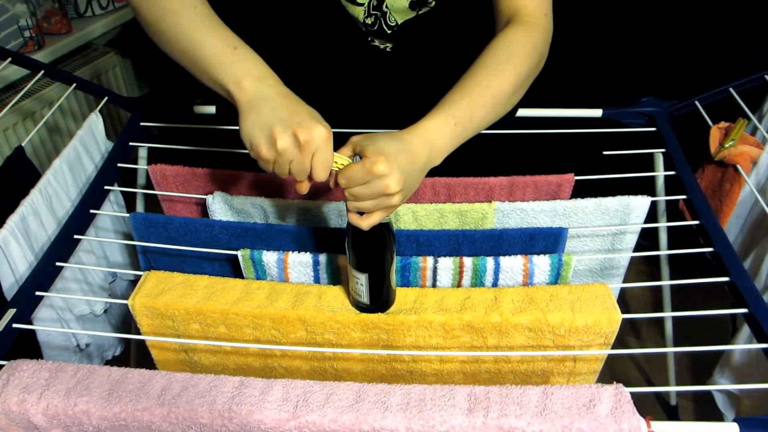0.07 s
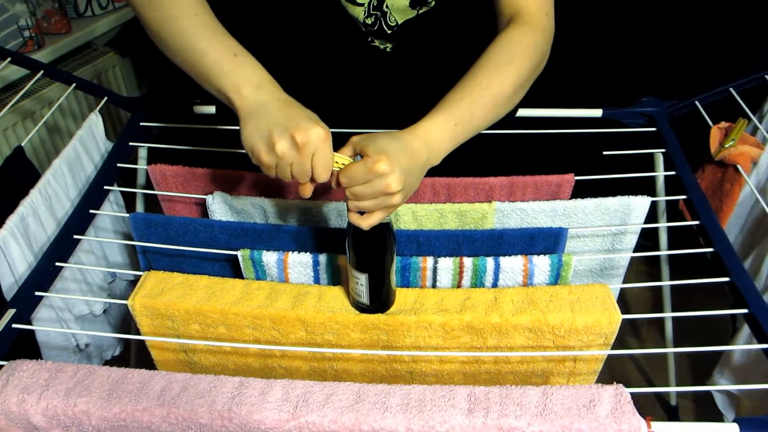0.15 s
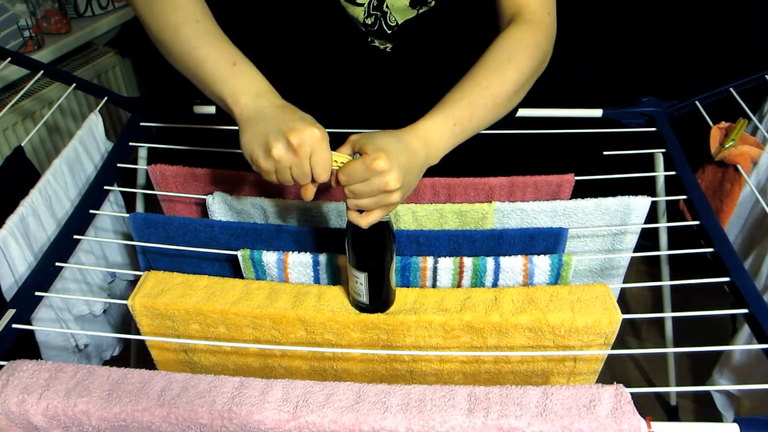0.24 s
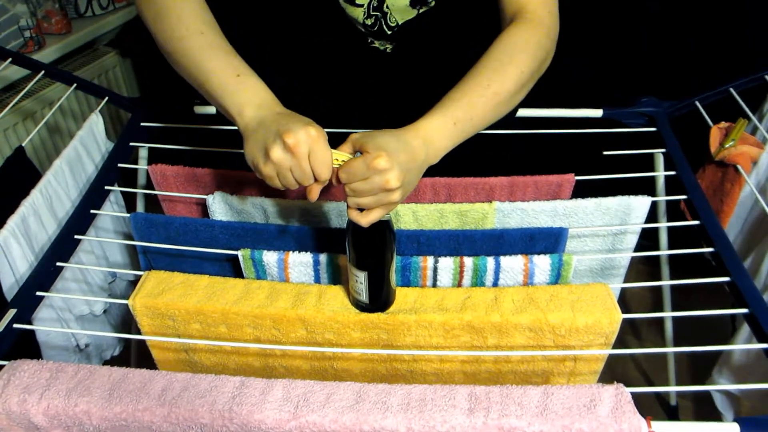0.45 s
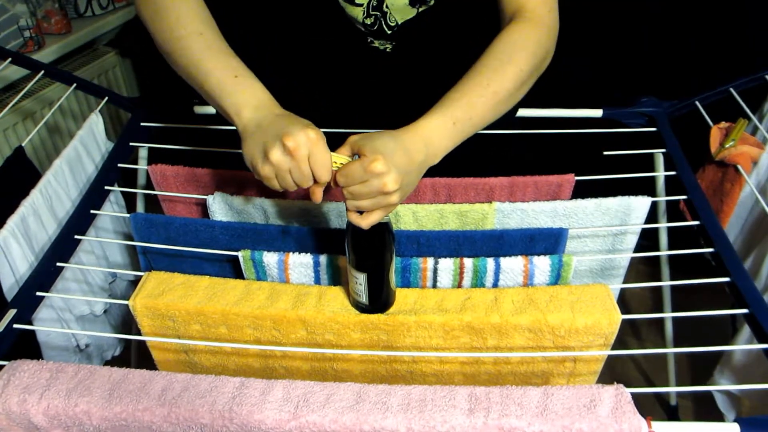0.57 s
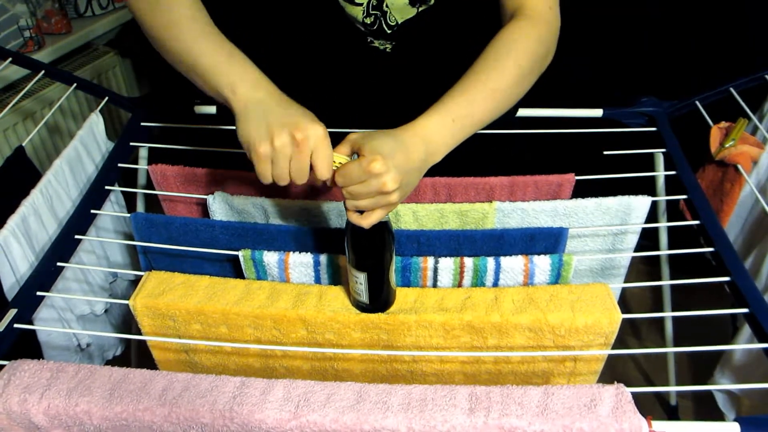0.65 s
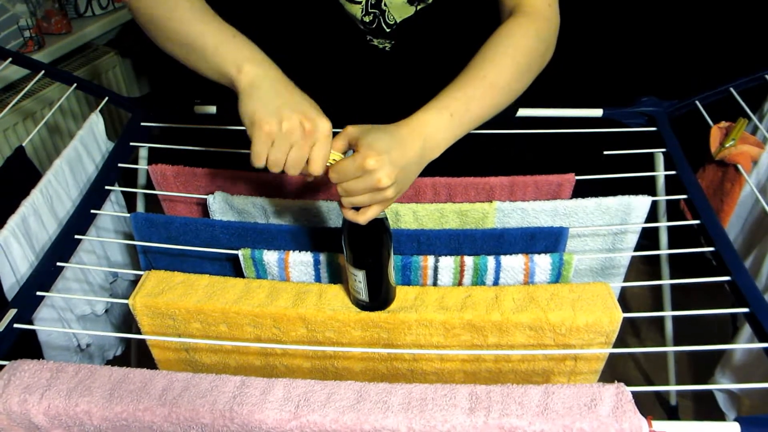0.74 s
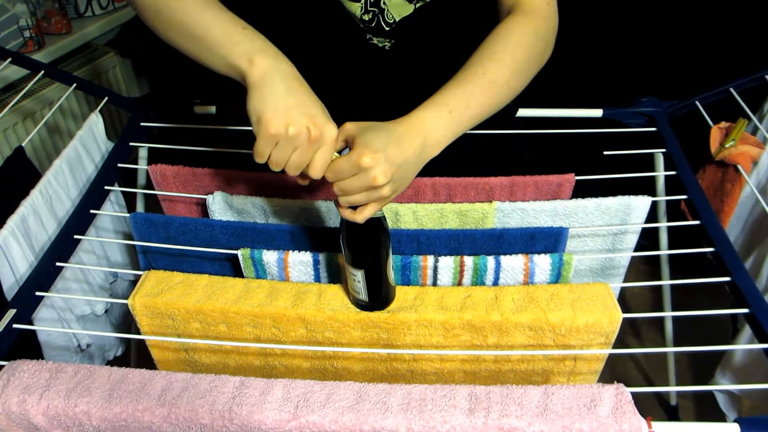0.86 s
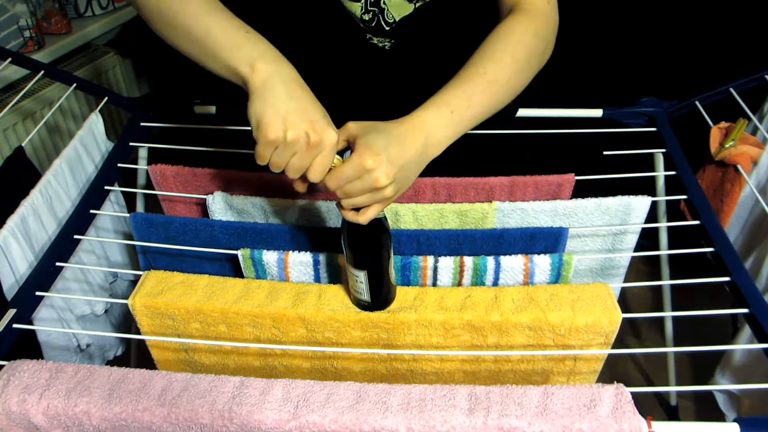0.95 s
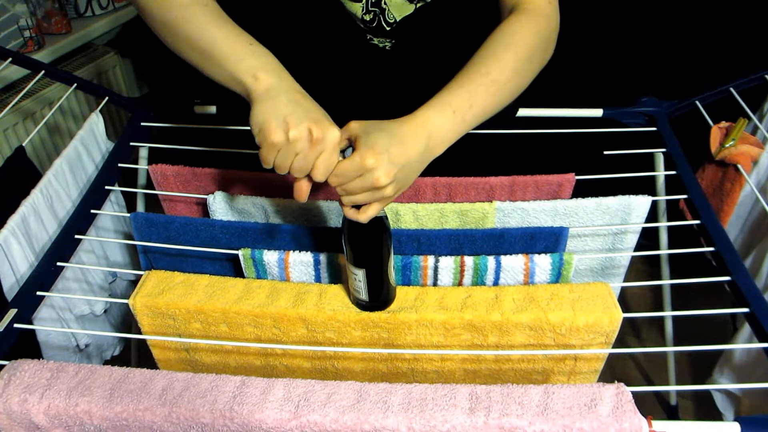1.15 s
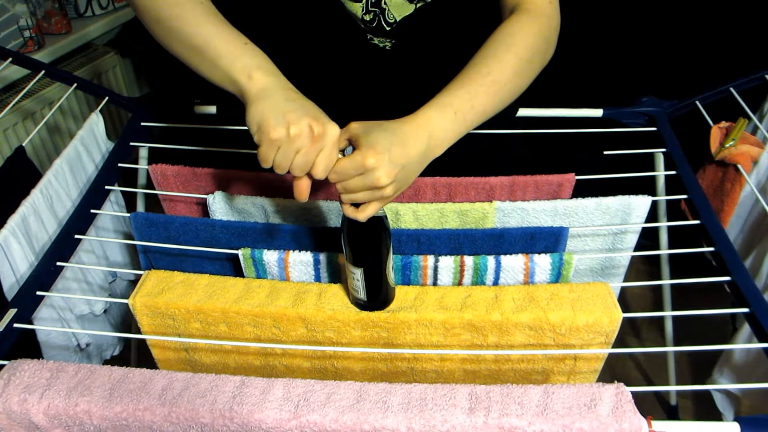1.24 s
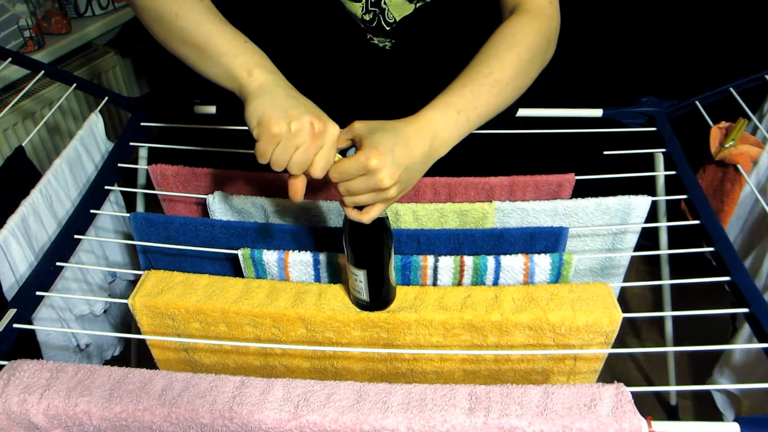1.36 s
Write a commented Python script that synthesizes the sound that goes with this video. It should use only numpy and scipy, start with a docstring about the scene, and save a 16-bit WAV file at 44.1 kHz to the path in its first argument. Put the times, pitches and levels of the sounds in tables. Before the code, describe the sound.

Faint camera motor ticks and dull handling knocks, one harder with a clack, then a bottle cap snaps free very loudly and briefly; soft bumps and light metal taps end it, in a small quiet room, mono.

```python
"""Crown cap levered off a bottle

In a small, soft room a cap snaps free at 0.4 s: ringing modes and noise, near echoes, a fast noise tail.
Dull knocks ring the camera housing as damped modes, the hard one at 0.198 s with a bright clack.
Its focus motor ticks evenly at first (noise bursts); opener clicks, finger rubs, late bright ticks and
cap taps are bursts and modes. Filtered noise makes room rumble, housing drone and hiss."""
import sys
import numpy as np
from scipy import signal
from scipy.fft import rfft, irfft
from scipy.io import wavfile
from scipy.ndimage import uniform_filter1d

SR = 44100
rng = np.random.default_rng(int(sys.argv[2]) if len(sys.argv) > 2 else 0)


def to_wav(s):
    """Save 16-bit WAV."""
    ch = np.atleast_2d(s).T  # columns
    pcm = np.round(np.clip(ch, -1, 1) * 32767)  # PCM
    wavfile.write(sys.argv[1], SR, pcm.astype(np.int16))


N = 61739
T = np.arange(N) / SR

# small metal contact, click and scrape spectrum: f/Hz, density/dB
CLICK = [(1300, -10), (1600, -0.5), (2500, 4.5), (3300, -2.5), (4100, -8), (4800, -18.5)]
SCRAPE_T60_S = 0.14


def undb(db):
    """dB to gain."""
    return 10 ** (np.asarray(db) / 20)


def curve(rows):
    """Gain over time, interpolated in dB from (t/s, level/dB) rows."""
    return undb(np.interp(T, *np.array(rows).T))


def coloured(points, size=N):
    """Noise of rms 1 with an (f/Hz, density/dB) spectrum, silent outside it."""
    f_hz, db = np.array(points).T
    bins_hz = np.fft.rfftfreq(size, 1 / SR) + 1
    gain = undb(np.interp(np.log(bins_hz), np.log(f_hz), db, -200, -200))
    x = irfft(rfft(rng.standard_normal(size)) * gain, size)
    return x / x.std()


def walk(rate_hz):
    """Random wander of spread 1: white noise averaged twice over 1/rate_hz."""
    k = int(SR / rate_hz)
    w = uniform_filter1d(uniform_filter1d(rng.standard_normal(N), k), k)
    return w / w.std()


def envelope(t, rise_s, t60_s):
    """Exponential rise times a 60 dB decay in t60_s."""
    return (1 - np.exp(-t / rise_s)) * 1000. ** (-t / t60_s)


def ring(modes, rise_s, lag_at_1k_s=0.):
    """Sum of decaying sine modes (f/Hz, level/dB, T60/s); each starts late in proportion to its period."""
    out = 0
    for hz, db, t60_s in modes:
        t = np.maximum(T[:8192] - lag_at_1k_s * 1000 / hz, 0)
        out = out + undb(db) * envelope(t, rise_s, max(t60_s, 1e-3)) * np.sin(2 * np.pi * hz * t)
    return out


def burst(points, t60_s, rise_s):
    """Short puff of coloured noise."""
    t = T[:8192]
    return coloured(points, size=len(t)) * envelope(t, rise_s, t60_s)


def add(out, at_s, x):
    """Mix x in at a time."""
    i = int(at_s * SR)
    out[i:i + len(x)] += x[:N - i]


def room_rumble():
    """Low-weighted room noise, its level wandering."""
    # rumble spectrum: f/Hz, density/dB
    spectrum = [(15, -5.5), (25, 0), (108, -4), (264, -10), (500, -13), (900, -10), (1250, -18.5),
                (1450, -28), (2000, -34.5)]
    # rumble level: t/s, level/dB
    level = [(0.0, -59.5), (0.338, -58.5), (0.51, -64), (0.7, -63.5), (1.054, -61), (1.4, -63.5)]
    return curve(level) * undb(1.1 * walk(15)) * coloured(spectrum)


def housing_drone():
    """The housing rings with handling rumble: a narrow noise band, its level wandering."""
    # drone level: t/s, level/dB
    level = [(0.0, -63), (0.15, -64), (0.272, -58.5), (0.358, -62), (0.54, -67.5), (0.75, -66.5),
             (1.016, -62), (1.4, -65.5)]
    centre_hz, width_hz = 1160.6, 170
    edge_hz = width_hz / 2
    spectrum = [(centre_hz - 3 * edge_hz, -22), (centre_hz - edge_hz, -3), (centre_hz, 0),
                (centre_hz + edge_hz, -3), (centre_hz + 3.04 * edge_hz, -24)]
    return curve(level) * undb(1.7 * walk(23.6)) * coloured(spectrum)


def room_hiss():
    """Soft mid-band room noise, its level wandering."""
    # room hiss spectrum: f/Hz, density/dB
    spectrum = [(1300, -5.5), (1500, 1), (2000, -3), (3000, -4.5), (3800, -15.5), (4500, -26)]
    # room hiss level: t/s, level/dB
    level = [(0.0, -74), (0.388, -79.5), (0.7, -80), (1.144, -78.5), (1.4, -81.5)]
    return curve(level) * undb(1.2 * walk(35)) * coloured(spectrum)


def preamp_hiss():
    """High-band preamp noise on a slow level curve."""
    # preamp hiss spectrum: f/Hz, density/dB
    spectrum = [(4200, -12.5), (5000, -24.5), (5900, -11.5), (6900, -7), (9000, -11.5), (10200, -20.5),
                (11300, -13.5), (12500, -6.5), (15400, -5), (16000, -11.5)]
    # preamp hiss level: t/s, level/dB
    level = [(0.0, -86.5), (0.396, -83.5), (0.584, -88.5), (0.758, -89.5), (0.992, -86), (1.4, -89.5)]
    return curve(level) * coloured(spectrum)


def motor_ticks():
    """Focus motor steps: evenly spaced noise bursts of uneven level."""
    # level of each motor step: level/dB
    levels = [-61.5, -66, -56.5, -54, -64, -64.5, -70, -66.5, -63, -67.5, -64.5]
    # tick spectrum: f/Hz, density/dB
    spectrum = [(2500, -4), (3300, -2.5), (4300, -17.5), (5300, -3.5), (6500, -18), (9500, -19),
                (12500, -4), (15800, -16)]
    start_s, period_s, t60_s = .0112, .06248, 0.0065
    out = np.zeros(N)
    for k, db in enumerate(levels):
        add(out, start_s + k * period_s, undb(db) * burst(spectrum, t60_s, 0.00012))
    return out


def housing_knocks():
    """Knocks carried into the housing excite its ring and a lower thud."""
    # knocks: t/s, level/dB, thud re ring/dB, rise/s
    knocks = [(0.049, -48, -8, 0.00084), (0.136, -48, -4, 0.0022), (0.1987, -28, -12, 0.00058),
              (0.2203, -42.5, -1, 0.001), (0.3227, -50.5, -12, 0.00091), (.347, -33, -11, 0.0028),
              (0.359, -74, -15, 0.0035), (.368, -40, -14, 0.0035), (0.424, -54.5, -9, 0.0037),
              (0.629, -48.5, -9, 0.0052), (.792, -49, -9.5, 0.0032), (0.896, -43, -9.5, 0.0031),
              (1.003, -44.5, -12, 0.0012), (1.039, -44, -18, 0.0017), (1.05, -44.5, -27, 0.003),
              (1.126, -60, -14.5, 0.003), (1.156, -51.5, -5.5, 0.0011)]
    # housing modes: f/Hz, level/dB, T60/s
    housing = [(1124, 2.5, 0.036), (1206, -10.5, 0.049)]
    # thud modes: f/Hz, level/dB, T60/s
    thud = [(62, -14, 0.05), (163, -6, 0.026), (368, -7.5, 0.036), (506, 0.5, 0.034), (862, -3, 0.04)]
    out = np.zeros(N)
    for s, db, thud_db, rise_s in knocks:
        add(out, s, undb(db) * (ring(housing, rise_s) + undb(thud_db) * ring(thud, rise_s)))
    return out


def opener_clicks():
    """Opener on the cap: a noise click, a brighter shorter one and a slower scrape."""
    # clicks: t/s, level/dB, bright part/dB, scrape/dB (parts relative to level)
    clicks = [(0.1981, -50, 0.5, -18), (.346, -65.5, -9, -4), (.697, -71, -18, -4.5)]
    # bright part spectrum: f/Hz, density/dB
    bright_spectrum = [(4500, -17), (5300, 5.5), (7500, -6.5), (9300, 10), (11000, -7), (12300, 1),
                       (15800, -21)]
    click_t60_s, bright_t60_s = 0.029, 0.011
    out = np.zeros(N)
    for s, db, bright_db, scrape_db in clicks:
        click = burst(CLICK, click_t60_s, 0.0003)
        bright = undb(bright_db) * burst(bright_spectrum, bright_t60_s, 0.00025)
        scrape = undb(scrape_db) * burst(CLICK, SCRAPE_T60_S, 0.0043)
        add(out, s, undb(db) * (click + bright + scrape))
    return out


def housing_clack():
    """Upper modes of the hard knock at 0.198 s: a bright, short clack on the housing."""
    # clack modes: f/Hz, level/dB, T60/s
    modes = [(1587, 1.5, 0.032), (2260, 0.5, 0.022), (2770, 1, .017), (3200, -5.5, 0.016),
             (5030, -9.5, 0.013)]
    at_s, level_db = .1982, -44
    out = np.zeros(N)
    add(out, at_s, undb(level_db) * ring(modes, 0.00068))
    return out


def finger_rubs():
    """Fingers slide on the glass: decaying low-mid noise."""
    # rubs: t/s, level/dB, T60/s
    rubs = [(.344, -49, .09), (.405, -50, .2)]
    # rub spectrum: f/Hz, density/dB
    spectrum = [(150, -8), (360, 0.5), (520, -8), (800, 0.5), (950, -2), (1250, -6.5), (1700, -14.5)]
    out = np.zeros(N)
    for s, db, t60_s in rubs:
        add(out, s, undb(db) * burst(spectrum, t60_s, 0.0023))
    return out


def room_tail():
    """The room's answer to the pop: noise bands with their own decays and grainy levels."""
    # tail spectrum: f/Hz, density/dB
    spectrum = [(150, -16), (400, -13.5), (900, -10.5), (1450, -18.5), (1800, -13.5), (2200, -6.5),
                (2550, -0.5), (2800, -4.5), (3100, -10.5), (3800, -4), (5100, -11.5), (7000, -7),
                (12600, -3.5), (15600, -13), (16100, -42)]
    # tail decay: f/Hz, T60/s
    decay = [(200, 0.3462), (1000, 0.41), (2500, 0.2), (4000, 0.18), (7000, 0.14), (12000, 0.15),
             (16000, 0.15)]
    level_db, rise_s = -28, 0.004
    grain_db, grain_rate_hz = 2, 280
    t = T[:16384]
    out = np.zeros(len(t))
    f_hz, t60_s = np.array(decay).T
    noise = rfft(coloured(spectrum, size=len(t)))
    bins_hz = np.fft.rfftfreq(len(t), 1 / SR)
    for k in range(len(f_hz)):
        # triangular bands over log frequency, summing to one
        weight = np.interp(np.log(bins_hz + 1), np.log(f_hz), np.arange(len(f_hz)) == k)
        band = irfft(noise * weight)
        gain = undb(level_db + grain_db * walk(grain_rate_hz)[:len(t)])
        out += gain * band * envelope(t, rise_s, t60_s[k])
    return out


def pop():
    """The cap snaps free: cap modes, gas and rim noise, air in the neck, early echoes and room tail."""
    # cap modes: f/Hz, relative level/dB, T60/s
    cap_modes = [(2350, -3.5, 0.0051), (3922, -1.5, .004), (5190, -2.5, 0.004), (6320, -2, 0.0067)]
    # bright edge of the crack: f/Hz, relative level/dB, T60/s
    snap_modes = [(7700, 2, .0013), (10230, 4, 0.0016), (12500, 6, 0.0016), (15000, 5, .0013)]
    # air in the neck: f/Hz, relative level/dB, T60/s
    neck_modes = [(200, -5, .012), (350, -7, .02), (600, -9, .014), (760, 0, .018), (1250, -2, .04)]
    # early echoes: delay/s, crack level/dB, snap level/dB
    echoes = [(.0016, -12, -16), (.0031, -22, -12), (.0053, -10, -2), (.0068, -18, -10), (0.0113, -24, -20),
              (0.0198, -30, -20), (.0214, -26, -20)]
    at_s, level_db, neck_db = .3983, -5, -37
    lag_at_1k_s = .0012  # low modes speak later than high ones
    rattle_db, rattle_t60_s = -15, 0.016
    out = np.zeros(N)
    crack = ring(cap_modes, .0001, lag_at_1k_s) / 2
    snap = ring(snap_modes, .00003, lag_at_1k_s) / 2
    rattle_noise = coloured([(1700, -8), (2400, -2.0), (6000, 0.5), (16000, 1.0)], size=8192)
    rattle = undb(rattle_db) * rattle_noise * 1000. ** (-T[:8192] / rattle_t60_s)
    neck = undb(neck_db) * ring(neck_modes, 0.00036)
    add(out, at_s, undb(level_db) * (crack + snap + rattle) - neck)
    for delay_s, crack_db, snap_db in echoes:
        add(out, at_s + delay_s, undb(level_db) * (undb(crack_db) * crack + undb(snap_db) * snap))
    add(out, at_s, room_tail())
    return out


def bright_ticks():
    """Late bright ticks: very short high noise bursts, the last on a motor step."""
    # ticks: t/s, level/dB
    ticks = [(.484, -57), (.4995, -61), (.5097, -53)]
    # bright tick spectrum: f/Hz, density/dB
    spectrum = [(5000, -12), (6500, -14), (9000, -9), (12500, 9), (14000, -11)]
    out = np.zeros(N)
    for s, db in ticks:
        add(out, s, undb(db) * burst(spectrum, 0.0053, 0.00038))
    return out


def cap_taps():
    """The loose cap touches the glass: cap and glass modes, one echo and a scrape."""
    # taps: t/s, level/dB, bright part/dB, glass ring/dB (parts relative to level)
    taps = [(1.0051, -50, -8.5, -23), (1.1024, -57, -13, -31)]
    # tap modes: f/Hz, level/dB, T60/s
    tap_modes = [(2320, -4.5, 0.013), (2545, 2.5, 0.0096), (3110, -3.5, 0.011), (3830, -4, 0.0086)]
    # bright tap modes: f/Hz, level/dB, T60/s
    bright_modes = [(5600, -8.5, 0.007), (7500, -13, 0.0089), (9200, -11, .008), (10900, -4, 0.0063),
                    (12100, 0.5, 0.0073)]
    # glass modes: f/Hz, level/dB, T60/s
    glass_modes = [(4050, -1, 0.14), (4150, 0, .08)]
    echo_s, echo_db, scrape_db = 0.0049, -13, -18
    out = np.zeros(N)
    for s, db, bright_db, glass_db in taps:
        bright = undb(bright_db) * ring(bright_modes, .0002)
        glass = undb(glass_db) * ring(glass_modes, .002)
        tap = undb(db) * (ring(tap_modes, 0.00033) + bright + glass)
        scrape = undb(db + scrape_db) * burst(CLICK, SCRAPE_T60_S, .004)
        add(out, s, tap + scrape)
        add(out, s + echo_s, undb(echo_db) * tap)
    return out


def scene():
    """All sources, mono."""
    background = room_rumble() + housing_drone() + room_hiss() + preamp_hiss()
    handling = motor_ticks() + housing_knocks() + opener_clicks() + housing_clack() + finger_rubs()
    opening = pop() + bright_ticks() + cap_taps()
    return (background + handling + opening)[None]


def record(dry):
    """The camera cuts the top: a steep elliptic low-pass."""
    top_hz = 16800
    return signal.sosfilt(signal.ellip(8, .2, 70, top_hz, fs=SR, output="sos"), dry)


dry = scene()
out = record(dry)
to_wav(out)
```